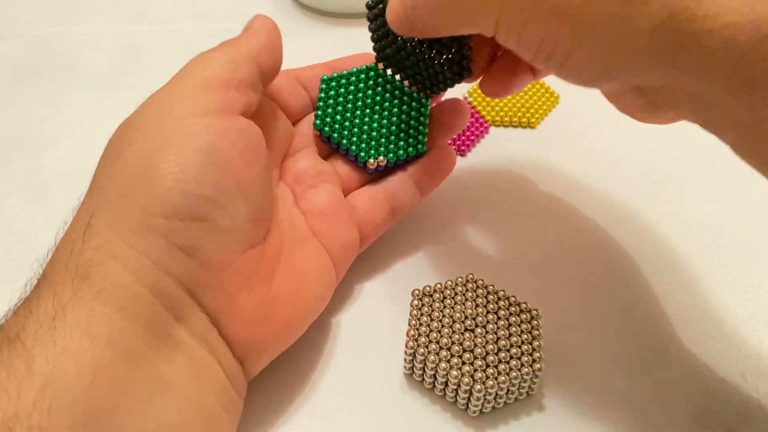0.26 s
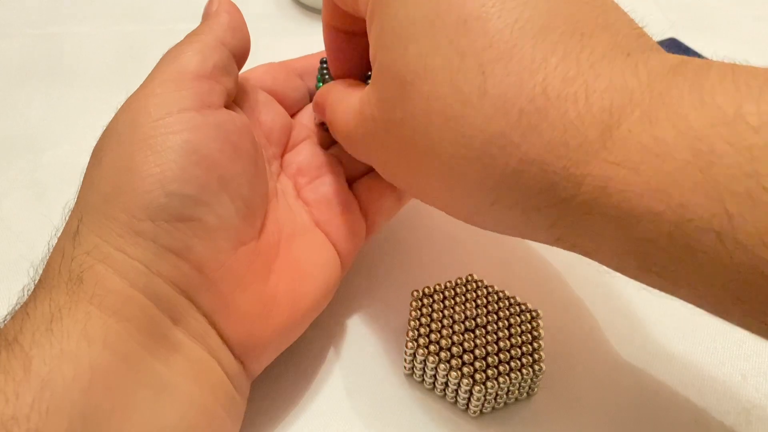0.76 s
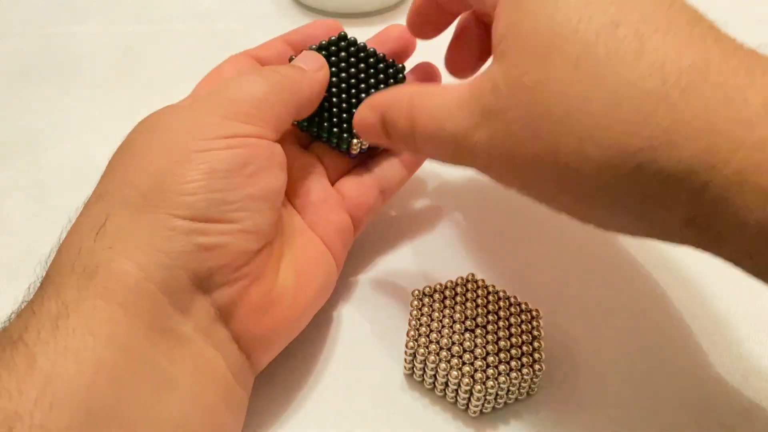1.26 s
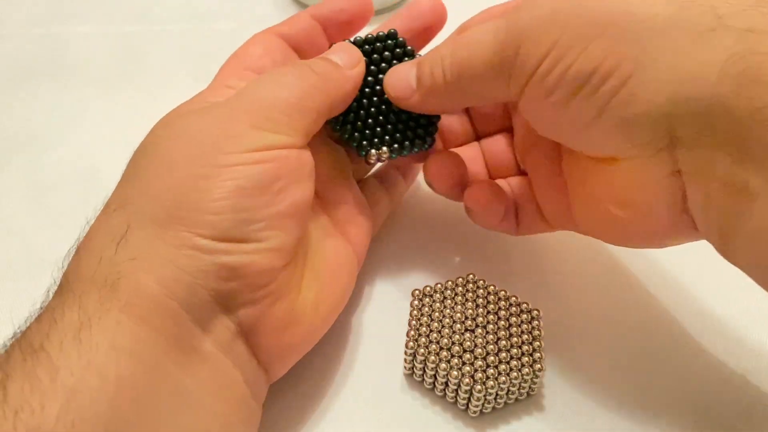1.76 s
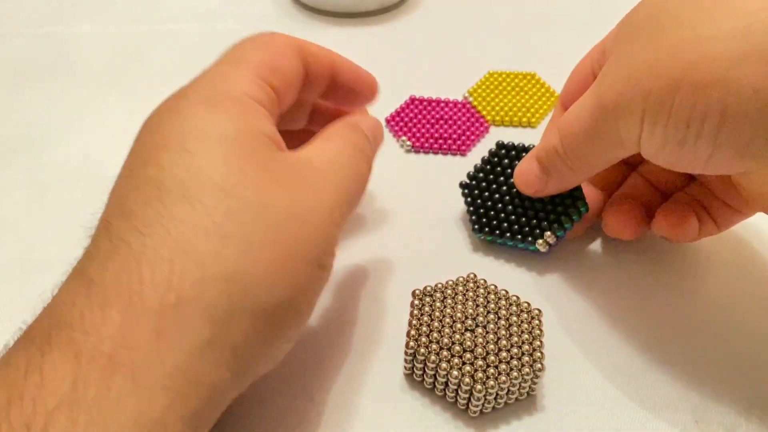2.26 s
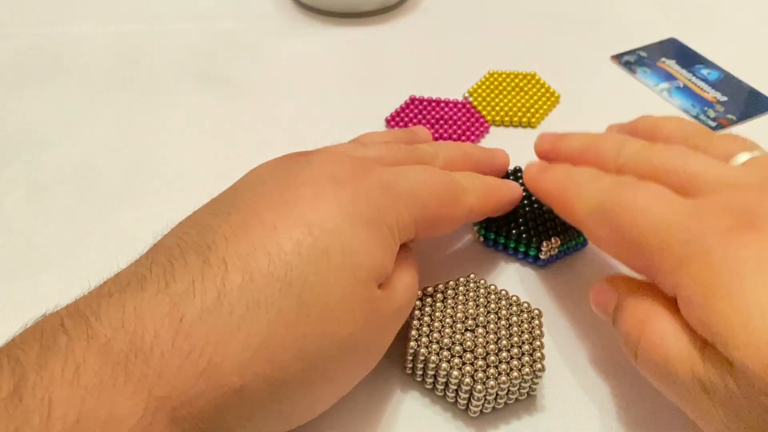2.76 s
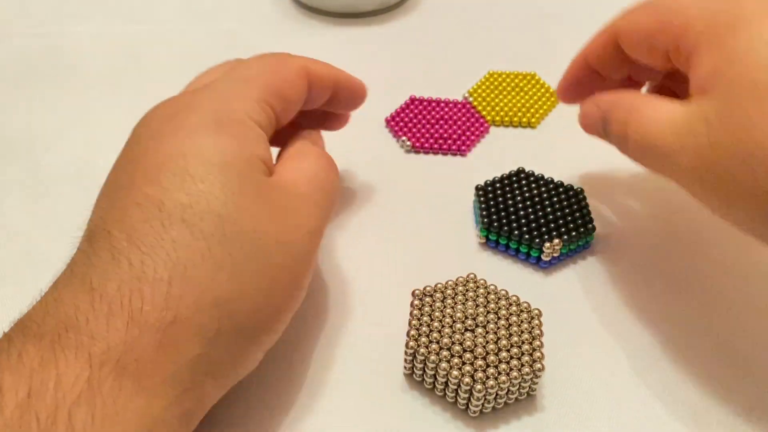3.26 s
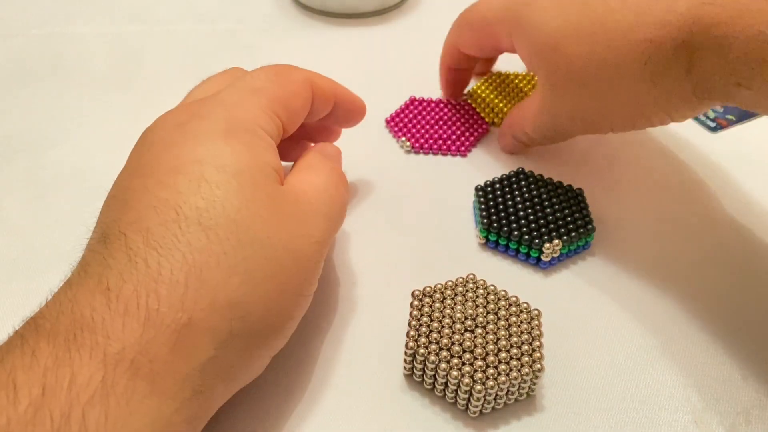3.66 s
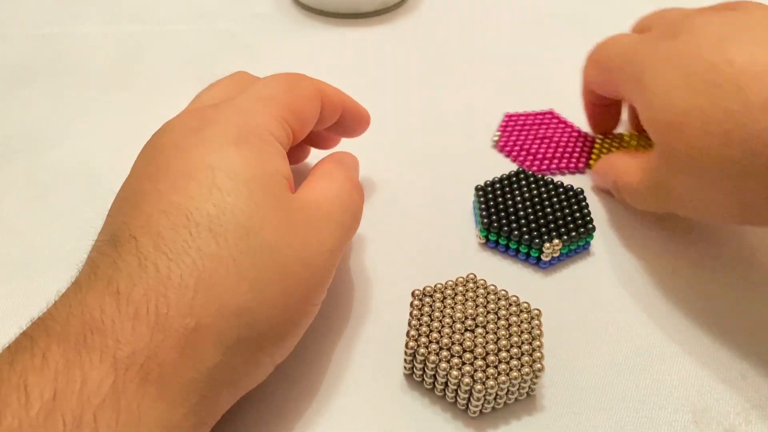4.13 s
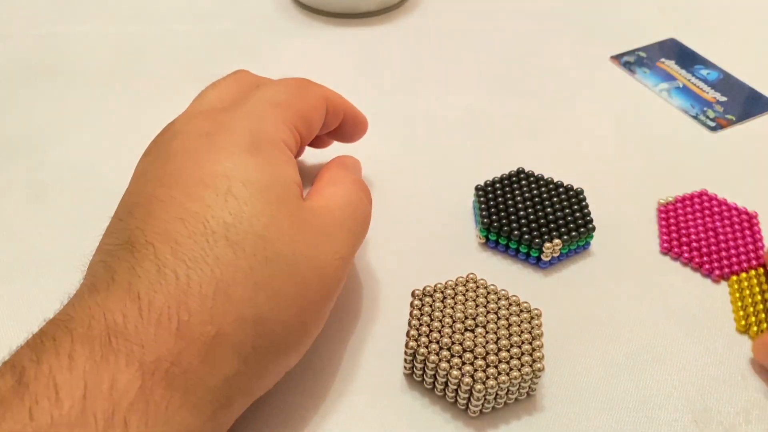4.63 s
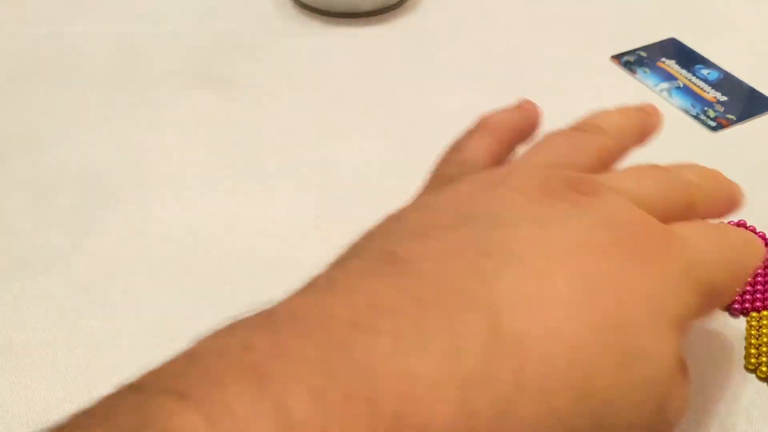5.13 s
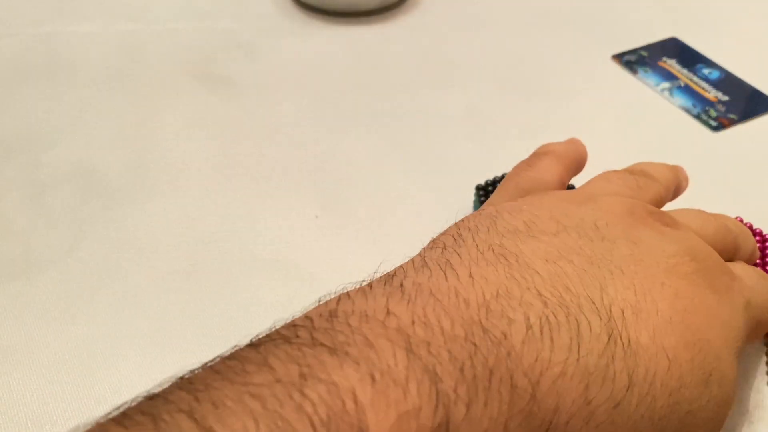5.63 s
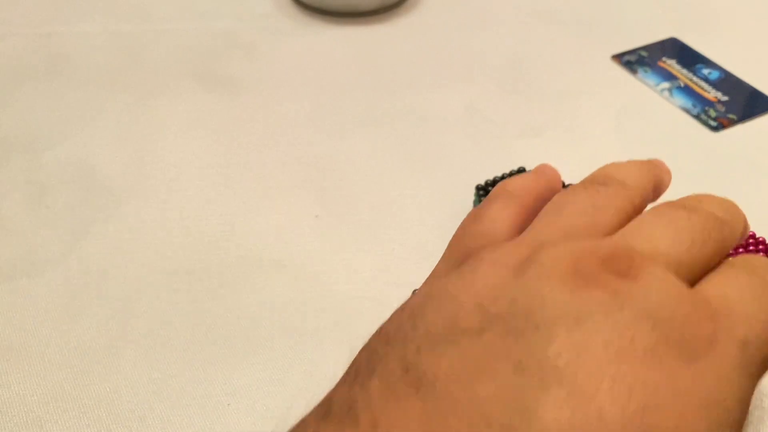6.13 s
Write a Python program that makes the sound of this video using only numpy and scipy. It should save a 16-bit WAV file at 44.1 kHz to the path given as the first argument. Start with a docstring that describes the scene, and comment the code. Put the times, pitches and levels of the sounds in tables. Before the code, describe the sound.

A quiet room with low rumble, faint hum and soft hiss, heard close up. Barely audible brushing on cloth comes first; from about 0.5 to 0.85 seconds small steel balls tick and rattle in the hands, with two sharper clicks near 0.7 and 0.8. Faint rubbing continues, with a stronger knock at 2.2. At about 2.37 a fine metallic hiss swells instantly into a very loud, bright snap with a deep table thump and a short room echo. Soft finger knocks follow at 2.8 and 3.05, with a light brush near 3.2. Around 3.57 there is a small click, then from 3.7 to 4.5 slabs drag roughly across the weave, bumping and scraping, fading by 4.8. A tiny thin squeak comes near 4.85, then muffled hand rubbing, with light scrapes around 5.6 and 5.8, a double knock at 6.1 and a last rising drag to the end.

```python
"""Slabs of small magnetic steel balls, handled on a cloth-covered table in a quiet room, microphone close by.
Over rumble, faint tones and hiss (coloured noise, sines), light drags cross the cloth and balls tick in the hands.
After two seconds a fine hiss swells and a slab lands and snaps flat: pitched pulses ring table, slab and frame.
Fingers knock and slabs are dragged hard over the weave (shaped noise), then a finger squeaks on the cloth
(gliding sine), a cupped hand rubs (moving noise band), and soft knocks and drags run on to the end."""
import sys
import numpy as np
from scipy import signal
from scipy.io import wavfile
from scipy.ndimage import uniform_filter1d

SR = 44100
rng = np.random.default_rng(int(sys.argv[2]) if len(sys.argv) > 2 else 0)


def wrap_up_sound(samples):
    """Save the sound to the file named by the first command line argument, as 16-bit audio."""
    columns = np.atleast_2d(samples).T
    # keep every value between -1 and 1, then stretch to whole-number steps
    tamed = np.clip(columns, -1, 1)
    steps = np.round(tamed * 32767).astype(np.int16)
    wavfile.write(sys.argv[1], SR, steps)


N = 281799

# ringing modes of the table top: f/Hz, level/dB, t60/s
TABLE_TOP = [(199, -9, 0.32), (270, 0, 0.066), (390, -14, 0.035), (438, -9.5, 0.049), (514.3, 3.5, 0.03),
             (637, 8, 0.014), (725, -9.5, .05), (1060, -13, 0.04), (1320, -5, 0.0083), (2230, -16.5, .015)]
# rows of balls pulling shut one after another: start t/s, end t/s, rms level/dB
SNAP_RUN = (2.3748, 2.3794, -12.5)
AIR_HZ, AIR_DB = 11300, -19.5  # the sound is far weaker above this
USUAL_DB = -60  # reference level for the force of ticks and scrapes


def gain_of(db):
    """Gain of a level in dB."""
    return 10 ** (np.asarray(db) / 20)


def evened(x):
    """Scales to rms 1."""
    return x / np.sqrt(np.mean(x ** 2) + 1e-20)


def read(points, hz):
    """Reads a table on a log-frequency axis."""
    f, value = np.transpose(points)
    return np.interp(np.log(hz + 1), np.log(f + 1), value)


def add(mix, s, sound):
    """Adds a sound at a time in s."""
    part = mix[..., round(s * SR):][..., :sound.shape[-1]]
    part += sound[..., :part.shape[-1]]


def along(s, db):
    """Gain over the whole scene from a level curve, silent outside it."""
    t = np.arange(N) / SR
    fade = np.clip(np.minimum(t - s[0], s[-1] - t) / 0.0062, 0, 1)
    return fade * gain_of(np.interp(t, s, db))


def split(x, hz):
    """The parts of x below and above hz."""
    dull = signal.sosfiltfilt(signal.butter(2, hz, fs=SR, output="sos"), x)
    return dull, x - dull


def ring(modes, lags=0):
    """Impulse response of decaying modes, each with its lag in radians, peak 1."""
    t = np.arange(SR // 2) / SR
    wave = 0
    for (hz, db, t60), lag in zip(modes, lags + np.zeros(len(modes))):
        wave = wave + gain_of(db - 60 * t / t60) * np.sin(2 * np.pi * hz * t - lag)
    return wave / abs(wave).max()


def causal(colour):
    """Shortest (minimum-phase) impulse response with this spectrum, peak 1."""
    hz = abs(np.fft.fftfreq(2048, 1 / SR))
    log_gain = np.log(gain_of(np.maximum(read(colour, hz), -100)))
    wave = np.fft.ifft(np.conj(np.exp(signal.hilbert(log_gain)))).real[:512]
    return wave / abs(wave).max()


def noise(colour, patchy_db, flicker_db, unlike, size, order=3):
    """Two-channel noise with drifting bands that last `order` frames and a flicker shared by all frequencies."""
    # likeness of the two ports: f/Hz, likeness (0 to 1)
    likeness = [(60, 1), (170, 0.77), (470, 0.84), (1320, 0.48), (3690, 0.045), (10400, 0.1)]
    # left port over right port: f/Hz, level/dB
    tilt = [(60, 0.5), (170, -5), (470, -3), (1320, -2), (3690, 3.5), (10400, -3)]
    frames, hz = 2 * N // size + 3, np.fft.rfftfreq(size, 1 / SR)
    a, b, c, d, patches = rng.standard_normal((frames, len(hz), 5)).T
    patches = uniform_filter1d(patches, size=4, axis=0)
    patches = evened(uniform_filter1d(patches, size=order, axis=1))
    flicker = evened(uniform_filter1d(rng.standard_normal(frames), size=2))
    # a higher `unlike` drives the ports apart
    same = np.clip(read(likeness, hz), .01, 1)[:, None] ** abs(unlike)
    left = a + 1j * b
    right = same * left + np.sqrt(1 - same ** 2) * (c + 1j * d)
    z = np.array([left, right])
    z *= gain_of(read(colour, hz)[:, None] + patchy_db * patches + flicker_db * flicker)
    z *= gain_of(np.multiply.outer([.5, -.5], read(tilt, hz)))[:, :, None]
    return evened(signal.istft(z, window="cosine", nperseg=size)[1][:, :N])


def background():
    """Lumpy rumble of house and table, faint tones that come and go, and microphone hiss, as noise and sines."""
    # rumble level: t/s, level/dB
    rumble_level = [(0.0, -65.5), (1.99, -61), (2.49, -46.5), (2.95, -56.5), (3.58, -60.5), (3.77, -40.5),
                    (4.0, -54), (4.79, -55.5), (5.92, -58), (6.39, -53.5)]
    # rumble spectrum: f/Hz, level/dB per Hz
    rumble_colour = [(12, -44), (20, -21.5), (32, 0.5), (54, -1), (129, -5), (215, -11.5), (267, -17),
                     (298, -14.5), (376, -16.5), (579, -35), (800, -44), (1040, -65.5), (1760, -120)]
    # hiss spectrum: f/Hz, level/dB per Hz
    hiss_colour = [(290, -27), (500, -1.5), (726, -12), (1150, -12), (1880, -17), (5190, -22.5),
                   (8460, -28), (10800, -28.5), (14000, -58.5), (22000, -120)]
    # faint tones: start t/s, end t/s, f/Hz, rms level/dB
    tones = [(0.98, 1.657, 267, -76.5), (1.426, 2.194, 370, -80), (2.498, 6.307, 289.3, -71.5)]
    t = np.arange(N) / SR
    rumble = noise(rumble_colour, patchy_db=3.0, flicker_db=2.5, unlike=0.27, size=2048)
    hum = 0
    for start, end, hz, db in tones:
        swell = along([start, start + 0.062, end - .15, end], [db - 36, db, db, db + 2])
        hum = hum + swell * np.sin(2 * np.pi * hz * t)
    hiss = gain_of(-79.5) * noise(hiss_colour, patchy_db=0.9, flicker_db=0.85, unlike=5.0, size=512)
    return gain_of(np.interp(t, *np.transpose(rumble_level))) * rumble + np.sqrt(2) * hum + hiss


def hollow():
    """The rub under the cupped hand: a band of noise whose centre shifts as the hand moves."""
    # the band: t/s, f/Hz, level/dB
    band = [(4.98, 1244, -83.5), (5.1, 1352, -79), (5.279, 2080, -78), (5.5, 1910, -80), (5.9, 1500, -70)]
    s, hz, db = np.transpose(band)
    slow = uniform_filter1d(rng.standard_normal((2, 2, N)), size=45)
    a, b = evened(uniform_filter1d(slow, size=45))
    turn = 2 * np.pi * np.cumsum(np.interp(np.arange(N) / SR, s, hz)) / SR
    return along(s, db) * (a * np.cos(turn) + b * np.sin(turn))


def squeak():
    """A finger on the cloth: a thin sine glide, its pitch slightly unsteady."""
    # the glide: t/s, f/Hz, rms level/dB
    glide = [(4.81, 5250, -88), (4.85, 4960, -86), (4.88, 5200, -87), (4.92, 5480, -92)]
    s, hz, db = np.transpose(glide)
    waver = 1 + 0.013 * evened(uniform_filter1d(rng.standard_normal(N), size=60))
    pitch = np.interp(np.arange(N) / SR, s, hz) * waver
    return along(s, db) * np.sqrt(2) * np.sin(2 * np.pi * np.cumsum(pitch) / SR)


def rustle():
    """Fine noise, like many tiny steel contacts: in the hands, and as a fine hiss swelling up to the snap."""
    # one list a swell: t/s, level/dB
    swells = [
        [(.655, -84), (.68, -69), (.72, -73.5), (.76, -80)],
        [(.78, -77), (.815, -68), (.84, -75), (.9, -91)],
        [(2.26, -94), (2.31, -71), (2.34, -65), (2.365, -60), (2.369, -44), (2.376, -38)],
    ]
    # spectrum: f/Hz, level/dB per Hz
    colour = [(1500, -23.5), (2800, 1.5), (4000, -1), (6000, -1.5), (8000, -9.5), (10500, -23)]
    grit = noise(colour, patchy_db=-0.5, flicker_db=-1.5, unlike=0.54, size=128)
    return grit * sum(along(*np.transpose(swell)) for swell in swells)


def ticks():
    """Balls click into place in the hands, each landing with a tiny dying rattle of contacts."""
    # clearest single balls: t/s, peak level before panning/dB, lift of the body below body_hz/dB
    clear = [(0.5226, -65, 15), (0.583, -57.5, 22), (0.6566, -53.5, 8), (0.668, -58, 3), (0.678, -56, 5),
             (0.681, -52, 3), (0.6926, -57, 3), (0.698, -46.5, 3), (0.701, -57, -2), (0.712, -61, 0),
             (0.7175, -51, -2), (0.72, -48, -5), (0.7222, -38, -12), (0.7912, -66, 2), (0.7957, -56, 0),
             (0.8095, -59, 2), (0.8154, -53, -3), (0.8178, -35.5, 1.5), (0.818, -47, -3), (0.832, -66, -3),
             (2.2107, -60, -2), (3.5545, -63, 14), (3.57, -53, 10)]
    # click spectrum: f/Hz, level/dB per Hz
    colour = [(290, -46), (500, -3), (1700, -13), (2660, -5.5), (3400, -3.5), (4560, -5.5), (6540, 5.5),
              (8350, -2), (9870, -6), (10800, -19.5), (12500, -22), (15000, -7), (22000, -23)]
    # smaller clicks at random: start t/s, end t/s, rate/per s, mean peak level/dB
    flurries = [(0.656, 0.743, 200, -80), (0.788, 0.857, 200, -69)]
    body_hz = 4200
    first, hard_slope = 2.2, 0.29  # first contact before cubing; dB of topmost treble per dB of force
    pan_mean_db, pan_spread_db, size_spread_db = 4.5, 2.5, 1  # the hands are to the left
    out, click, t = np.zeros((2, N)), causal(colour), np.arange(130) / SR
    body, top = split(click, body_hz)
    top, air = split(top, AIR_HZ)
    small = [(s, db + size_spread_db * rng.standard_normal(), 0) for start, end, rate, db in flurries
             for s in rng.uniform(start, end, round(rate * (end - start)))]
    for s, db, body_db in clear + small:
        draw = rng.standard_normal(130)
        pan_db = pan_mean_db + pan_spread_db * rng.standard_normal()
        contacts = np.r_[first, draw[1:]] ** 3 * np.exp(-t / 0.0009)
        ball = gain_of(body_db) * body + top + gain_of(hard_slope * (db - USUAL_DB)) * air
        rattle = np.convolve(contacts, ball)
        add(out, s, gain_of(db + np.array([[.5], [-.5]]) * pan_db) * rattle / abs(rattle).max())
    return out


def drag():
    """Balls bump over the weave and shake the top in its modes; the weave scrapes and the fibres hiss."""
    # one list a stroke over the cloth: t/s, scrape level/dB
    strokes = [
        [(.17, -91), (.3, -85.5), (.37, -94)],
        [(1.25, -99), (1.33, -88), (1.42, -85)],
        [(1.5, -96), (1.66, -80.5), (1.73, -89)],
        [(1.9, -80), (1.934, -70), (2.2, -73), (2.28, -59)],
        [(3.0, -94), (3.05, -86), (3.18, -70.5), (3.3, -86), (3.4, -100)],
        [(3.562, -85), (3.585, -70), (3.64, -74), (3.69, -74)],
        [(3.63, -73), (3.67, -64), (3.692, -49), (3.735, -50.5), (3.8, -56.5), (3.86, -61), (3.9, -76)],
        [(3.85, -78.5), (3.9, -50.5), (3.99, -48.5), (4.05, -50), (4.09, -47), (4.16, -49), (4.23, -45.5),
         (4.27, -51.5), (4.4, -53), (4.5, -59.5), (4.56, -81)],
        [(4.47, -101), (4.53, -59.5), (4.61, -57.5), (4.74, -62), (4.82, -85.5)],
        [(4.74, -91), (4.8, -74.5), (4.9, -75.5), (5.05, -74), (5.25, -76), (5.45, -78.5), (5.52, -103)],
        [(5.44, -92.5), (5.49, -68.5), (5.55, -64.5), (5.6, -61), (5.64, -67.5), (5.68, -69), (5.74, -79)],
        [(5.64, -87), (5.71, -64.5), (5.79, -63), (5.84, -60), (5.885, -67), (5.93, -85.5)],
        [(6.07, -84), (6.13, -67.5), (6.22, -55.5), (6.31, -59), (6.4, -59)],
    ]
    # what each stroke drags, against its scrape at USUAL_DB: shaking of the table/dB, hiss of the fibres/dB,
    # lift of the top of the scrape/dB, lift of the top of the hiss/dB, lift of the deep shaking/dB
    loads = [(5, -6.5, 10, 1, 4), (-5, -9, -4, 7, 4), (9, -6.5, -20, 1, -10), (6.5, -5.5, -19, -0.5, 0.5),
             (4, -7, -12, -1, 8), (10.5, 1, -4.5, 0.5, -1), (5, -4.5, -5, 1, 2), (4, -6, -10, 1, 1),
             (9, -5, -1, 4, -9.5), (5.5, -1.5, 8.5, -1, 3), (1.5, -6.5, 9.5, -17, -3),
             (0, -10.5, 6.5, 2, -8), (1, -3.5, -10, 7.5, 0.5)]
    # spectra of the shaking, the scrape and the fibres: f/Hz, level/dB per Hz
    shake_colour = [(60, -41.5), (150, -3.5), (210, -0.5), (330, 3), (520, 2), (700, -1.5), (900, -7.5),
                    (1400, -54)]
    scrape_colour = [(500, -11.5), (800, 1), (1100, -5), (1500, -4), (1800, -11.5), (2300, -22),
                     (3200, -44)]
    fibre_colour = [(880, -15), (1500, -7.5), (2090, -5.5), (2450, -3.5), (3300, -7), (4400, -9.5),
                    (5010, -10.5), (5530, -12.5), (6260, -10.5), (7270, -16.5), (9860, -24), (10800, -32),
                    (12000, -31), (13500, -20), (14600, -32), (22000, -120)]
    shake_slope, hiss_slope = 1.103, 0.77  # dB of shaking and of hiss for each dB of scrape
    surge_db, grain_depth, catches_per_s, catch_db = 1.0, 0.075, 220, 3.5

    bumps = noise(shake_colour, patchy_db=1.5, flicker_db=1.5, unlike=0.94, size=1024, order=5)
    rung = signal.oaconvolve(bumps, ring(TABLE_TOP)[None], axes=1)[:, :N]
    shake = evened(bumps + gain_of(-18.0) * rung)

    # the drag surges, and balls catch briefly in the weave
    slow = uniform_filter1d(uniform_filter1d(rng.standard_normal(N), size=900), size=900)
    surge = gain_of(surge_db * evened(slow))
    catches = gain_of(catch_db * np.minimum(rng.exponential(1, N), 4))
    catches = catches * (rng.random(N) < catches_per_s / SR)
    grain = surge * (1 + grain_depth * evened(signal.oaconvolve(catches, np.hanning(130), "same")))
    grain = evened(grain)

    scrape = noise(scrape_colour, patchy_db=1.5, flicker_db=1.27, unlike=0.97, size=1024, order=8)
    fibres = noise(fibre_colour, patchy_db=1.8, flicker_db=.9, unlike=.9, size=256, order=70)
    shake, shake_top = split(shake, 320.0)
    scrape, scrape_top = split(scrape, 1800.0)
    fibres, fibres_top = split(fibres, 4700.0)
    out = 0
    for stroke, load in zip(strokes, loads):
        shake_db, hiss_db, scrape_lift_db, hiss_lift_db, deep_db = load
        s, db = np.transpose(stroke)
        over_db = db - USUAL_DB
        shake_gain = along(s, USUAL_DB + shake_db + shake_slope * over_db)
        hiss_gain = along(s, USUAL_DB + hiss_db + hiss_slope * over_db)
        out = out + shake_gain * (gain_of(deep_db) * shake + shake_top)
        out = out + along(s, db) * grain * (scrape + gain_of(scrape_lift_db) * scrape_top)
        out = out + hiss_gain * grain * (fibres + gain_of(hiss_lift_db) * fibres_top)
    return out


def snap():
    """A dense run of steel contacts rings the slab; each port faces other rows of balls."""
    # modes of the slab of balls: f/Hz, width/Hz, level/dB, lag at the right port against the left/rad
    slab = [(1340, 450, 2, -1.45), (2220, 290, -3.5, -0.37), (2750, 92, -4, 4), (3470, 380, 1.5, 0.8),
            (3850, 400, 1, 0.4), (4940, 300, -14, 0.7), (5800, 310, -0.5, 0.4), (6140, 1500, -6.5, 0.5),
            (7080, 460, -16.5, 0.36), (8360, 270, -14.5, -1.5)]
    start, end, db = SNAP_RUN
    shared, left, right = rng.standard_normal((600, 3))[:round((end - start) * SR)].T
    shared = shared * abs(shared) * gain_of(np.linspace(-5.0, 0, len(shared)))  # the run gathers force
    modes = [(hz, level, 2.3 / width) for hz, width, level, _ in slab]
    lags = np.array(slab)[:, 3]
    rise = np.minimum(np.arange(1500) / SR / 0.0003, 1)  # contacts are not quite instant
    body = np.array([np.convolve(ring(modes, side * lags)[:1500] * rise, np.hanning(6)) for side in (-.5, .5)])
    sound = signal.fftconvolve([shared + 0.39 * left, shared + 0.3 * right], body, axes=1)
    out = np.zeros((2, N))
    add(out, start, gain_of(db) * sound / np.sqrt(np.mean(sound[:, :len(shared)] ** 2)))
    return out


def slap():
    """The slap of the slab as the walls return it: one coloured impulse to feed the echoes."""
    # spectrum: f/Hz, level/dB per Hz
    colour = [(410, -40), (700, -13.5), (1610, -4.5), (1790, -0.5), (2330, -3.5), (2640, -1), (3170, -8.5),
              (5890, -13), (10800, -53), (14000, -81.5), (22000, -120)]
    out = np.zeros(N)
    add(out, SNAP_RUN[0], gain_of(-1.5) * causal(colour))
    return out


def knocks():
    """A damped pulse that sinks in pitch is heard and rings the top; the frame answers with a thump."""
    # knocks, and low bumps within the drag near 3.75 s:
    # t/s, peak level/dB, nominal pitch of the contact pulse f/Hz, deep thump level/dB
    hits = [(2.2118, -16, 1080, -52), (2.364, -27.5, 880, -53), (2.369, -7.5, 1220, -26.5),
            (2.378, -4.5, 690, -12), (2.384, -13, 330, -24), (2.8018, -43, 735, -29),
            (2.85, -46, 203.3, -51), (3.044, -57, 703, -63), (3.568, -42.5, 892, -31),
            (3.731, -31.5, 400, -66), (3.744, -36, 340, -60), (3.768, -37, 301, -53),
            (3.929, -35, 460, -51), (4.007, -33, 445, -52), (4.24, -39, 500, -66), (4.935, -51, 356, -62),
            (5.6, -57, 510, -73), (5.83, -53.5, 706, -68), (6.095, -43.5, 500, -58.5),
            (6.097, -45.5, 923, -78)]
    # modes of frame and legs: f/Hz, level/dB, t60/s
    frame_modes = [(53, -9.5, 0.41), (75.18, 3, 0.18), (131, -12, 0.27), (144.5, -11, 0.28)]
    pulses, thumps, frame = np.zeros(N), np.zeros(N), ring(frame_modes)
    frame = frame * np.minimum(np.arange(len(frame)) / SR / 0.014, 1)  # the heavy frame takes a moment to move
    for s, db, hz, thump_db in hits:
        turns = np.arange(0, 6, hz / SR)
        pulse = turns ** 2 * np.exp(-turns / 0.37) * np.sin(2 * np.pi * 1.49 * turns ** 0.57)
        cushion = signal.butter(6, min(2.3 * hz, SR / 3), fs=SR, output="sos")  # the cloth softens the contact
        pulse = signal.sosfilt(cushion, pulse)
        add(pulses, s, gain_of(db) * pulse / abs(pulse).max())
        add(thumps, s, -gain_of(thump_db) * frame)
    table = gain_of(-26.5) * signal.oaconvolve(pulses, ring(TABLE_TOP))[:N]
    return pulses, table, thumps


def room(x):
    """Echoes as sparse taps of random sign, each band dying at its own speed."""
    # decay of the room: f/Hz, t60/s
    decay = [(100, 0.65), (500, 0.38), (1500, 0.4), (2700, .36), (4000, 0.33), (6500, 0.32), (10000, 0.35)]
    # left-right likeness of the echoes: f/Hz, likeness (0 to 1)
    echo_likeness = [(60, 0.32), (170, 0.33), (400, 0.83), (800, 0.18), (2000, 0.037)]
    early_db, early_s = 5, 0.0063  # nearby surfaces answer first and die quickly
    taps = np.zeros((2, SR))
    at = np.arange(60, SR - 20, 20) + rng.integers(0, 20, (2, (SR - 61) // 20))
    np.put_along_axis(taps, at, rng.choice([-1., 1.], at.shape), 1)
    taps = taps * (1 + gain_of(early_db) * np.exp(-np.arange(SR) / SR / early_s))
    hz, t, z = signal.stft(taps, SR, nperseg=256)
    same = np.clip(read(echo_likeness, hz), 0, 1)[:, None]  # the two ports share most of the echoes near 400 Hz
    z[1] = same * z[0] + np.sqrt(1 - same ** 2) * z[1]
    tail = signal.istft(z * gain_of(-60 * t / read(decay, hz)[:, None]), SR, nperseg=256)[1]
    return signal.fftconvolve(x[None], tail / np.linalg.norm(tail[0]), axes=1)[:, :N]


def scene():
    """Direct sounds, their echoes and the background."""
    pulses, table, thumps = knocks()
    clicks, rub = ticks(), drag()
    hits = pulses + table + thumps
    shaded = signal.lfilter(*signal.butter(1, 3000, fs=SR), hits)  # the right port hears these a little duller
    direct = np.array([hits, shaded]) * gain_of([[-.9], [.9]]) + snap() + clicks
    to_walls = gain_of(-1.0) * pulses + gain_of(-6.5) * table + slap()
    to_walls = to_walls + gain_of(-14.0) * clicks.mean(0) + gain_of(-6.5) * rub.mean(0)
    echoes = room(to_walls)
    return direct + echoes + rub + rustle() + squeak() + hollow() + background()


def record(dry):
    """The deepest bass and most of the top are weak, and loud peaks are rounded off, up to a band limit."""
    edge_hz = 16500  # band limit
    cut = signal.sosfilt(signal.butter(4, 38., "high", fs=SR, output="sos"), dry)
    rounded = 1.15 * np.tanh(cut / 1.33)
    full, main = (signal.firwin(255, hz, window=("kaiser", 7), fs=SR) for hz in (edge_hz, AIR_HZ))
    response = main + gain_of(AIR_DB) * (full - main)
    return signal.oaconvolve(rounded, response[None], "same")


dry = scene()
out = record(dry)
wrap_up_sound(out)
```